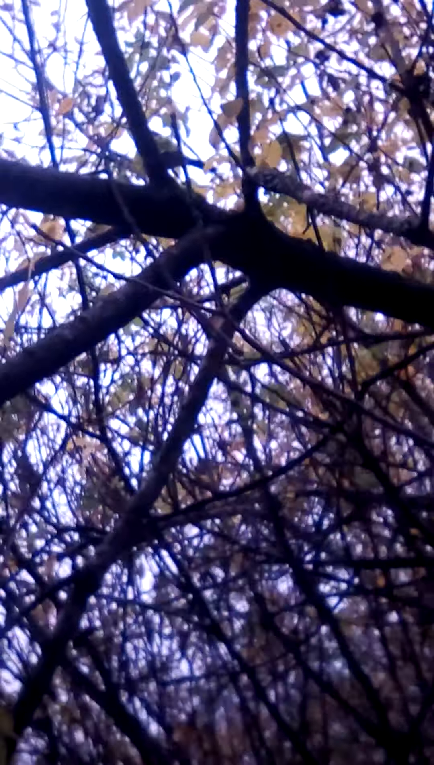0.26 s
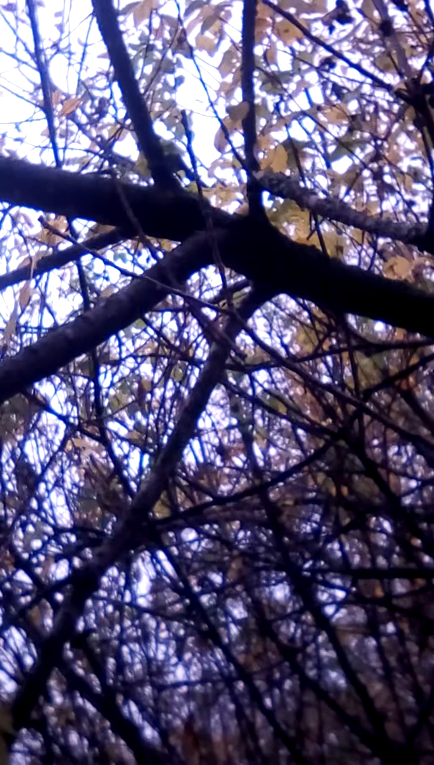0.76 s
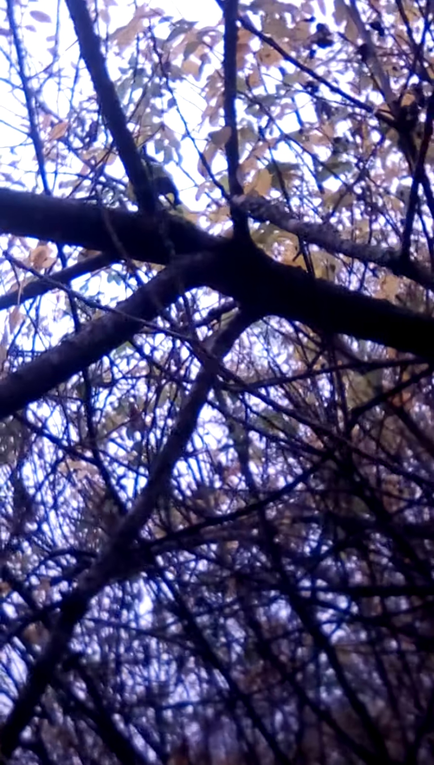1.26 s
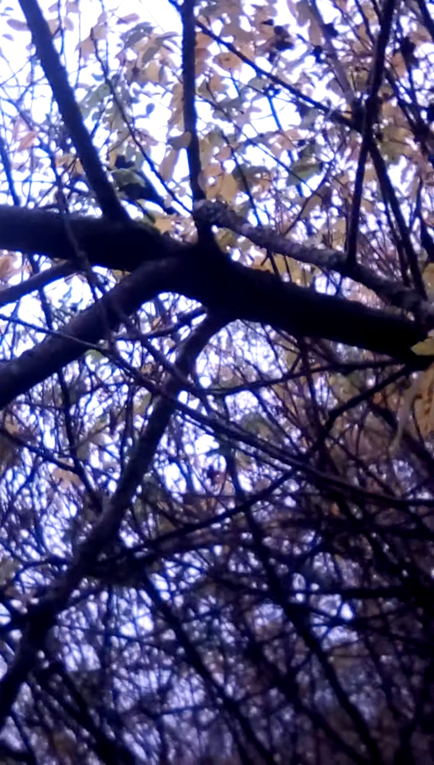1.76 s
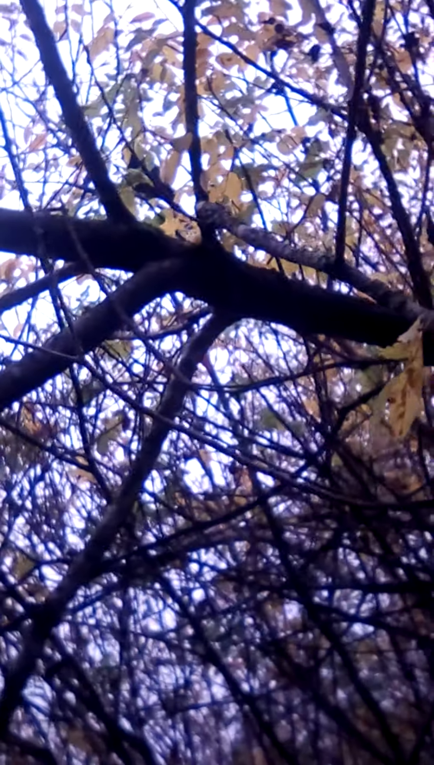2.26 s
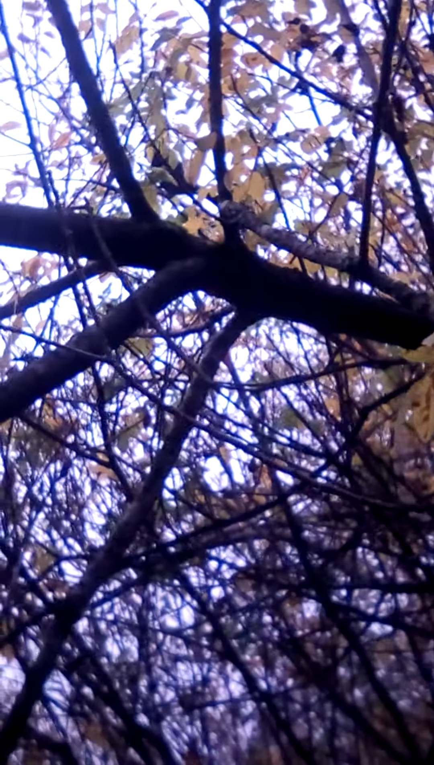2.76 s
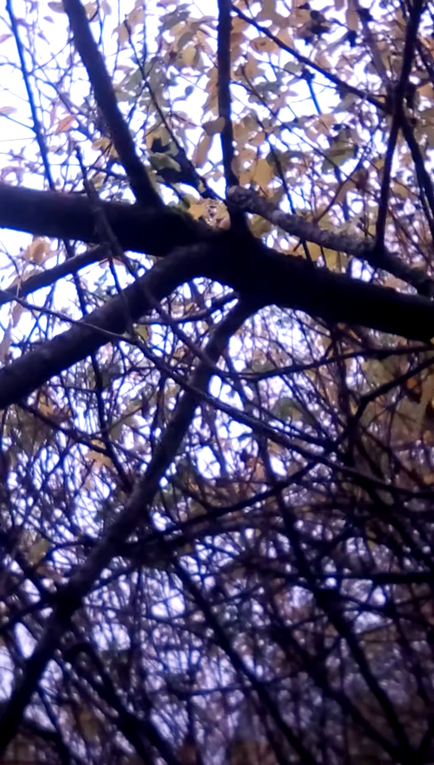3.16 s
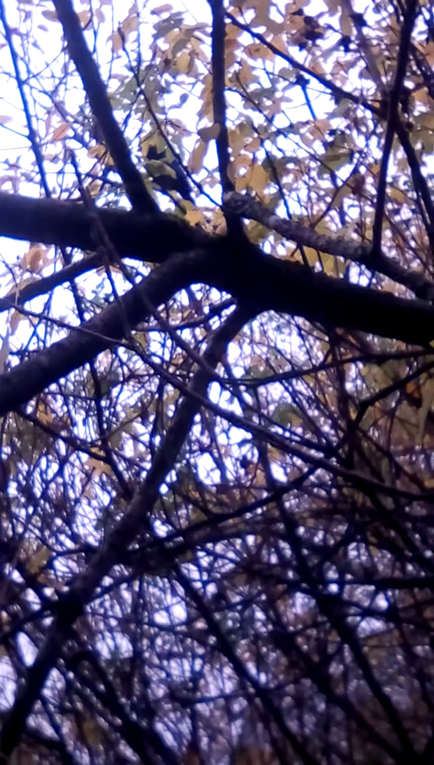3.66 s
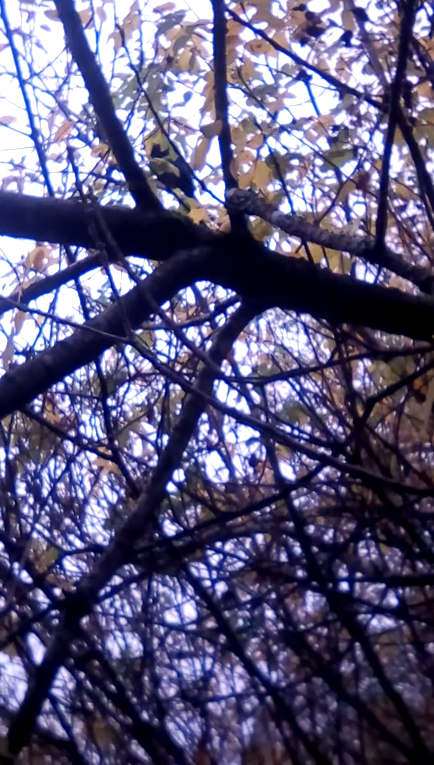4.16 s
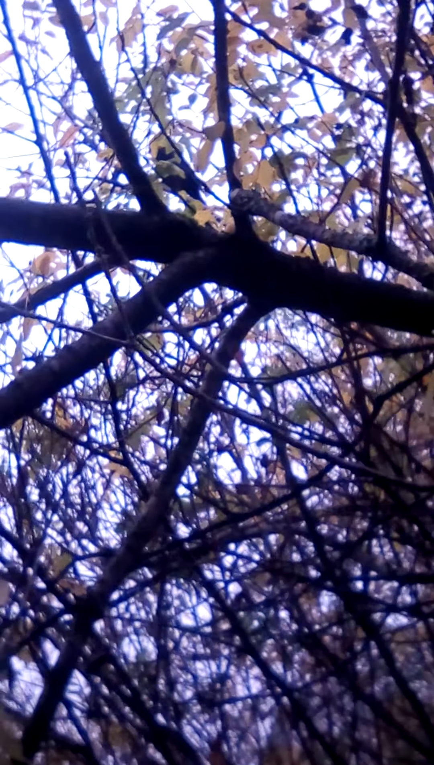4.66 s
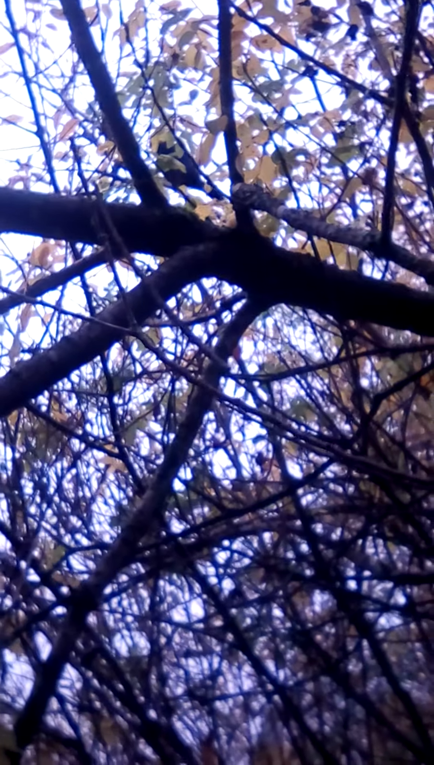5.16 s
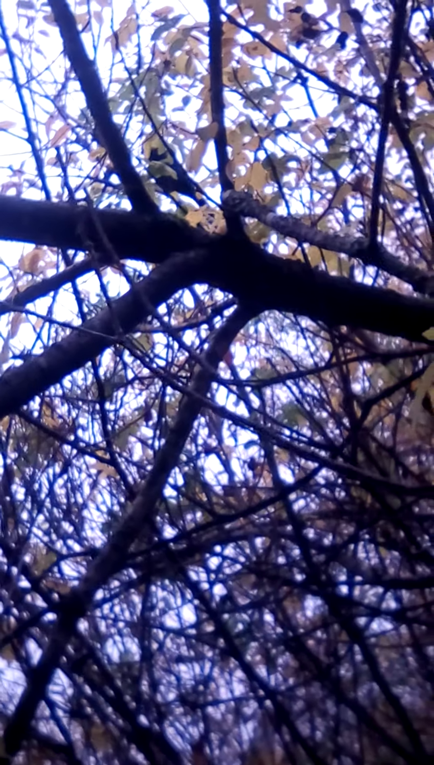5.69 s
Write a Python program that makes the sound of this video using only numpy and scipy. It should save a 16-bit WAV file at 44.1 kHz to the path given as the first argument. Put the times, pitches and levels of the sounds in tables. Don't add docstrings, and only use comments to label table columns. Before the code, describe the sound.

A bird in bare trees gives three quick runs of harsh, raspy chattering calls over a faint, steady distant road rumble.

```python
import sys
import numpy as np
from scipy import signal
from scipy.fft import rfft, irfft, next_fast_len
from scipy.io import wavfile
from scipy.ndimage import uniform_filter1d

SR = 44100
rng = np.random.default_rng(int(sys.argv[2]) if len(sys.argv) > 2 else 0)


def rack_gain(trim_db):
    fader = np.asarray(trim_db, float)
    return 10 ** (fader / 20)


def wrap_up_sound(samples):
    columns = np.atleast_2d(samples).T
    tamed = np.clip(columns, -1, 1)
    steps = np.round(tamed * 32767).astype(np.int16)
    wavfile.write(sys.argv[1], SR, steps)


N = 261513


def rms_one(x):
    return x / np.sqrt(np.mean(x ** 2) + 1e-20)


def along(rows, at):
    s, *columns = np.transpose(rows)
    return [np.interp(at, s, c) for c in columns]


def drift(rate_hz, size=N):
    settle = 9000
    r = np.exp(-2 * np.pi * rate_hz / SR)
    noise = rng.standard_normal(size + settle)
    return rms_one(signal.lfilter([1], [1, -2 * r, r * r], noise)[settle:])


def tone(hz):
    return np.sin(2 * np.pi * np.cumsum(hz) / SR)


def resonate(x, hz, width_hz):
    r = np.exp(-np.pi * width_hz / SR)
    poles = [1, -2 * r * np.cos(2 * np.pi * hz / SR), r * r]
    return signal.lfilter([(1 - r * r) / 2, 0, (r * r - 1) / 2], poles, x)


def coloured(spectrum, patchy_db):
    size = next_fast_len(N)
    hz = np.maximum(np.fft.rfftfreq(size, 1 / SR), 1)
    points_hz, points_db = np.transpose(spectrum)
    inside = (hz >= points_hz[0]) & (hz <= points_hz[-1])
    gain = rack_gain(np.interp(np.log(hz), np.log(points_hz), points_db))
    noise = rfft(rng.standard_normal(size)) * inside * gain
    octave = np.log2(hz)
    out = np.zeros(N)
    for k in range(int(octave[inside][0]), int(octave[inside][-1]) + 2):
        band = irfft(noise * np.clip(1 - abs(octave - k), 0, 1), size)[:N]
        out += band * rack_gain(patchy_db * drift(7.5))
    return rms_one(out)


# (frequency [Hz], density [dB per Hz])
RUMBLE_SPECTRUM = [(12, -39), (20, -20.5), (54, -2), (92, 0.5), (172, -5.5), (211, -10), (276, -11.5),
                   (347, -23.5), (420, -20.5), (550, -40), (920, -120)]
ROAR_SPECTRUM = [(180, -25), (300, -4), (386, -7.5), (605, -3), (887, -2.5), (983, -0.5), (1340, -3.5),
                 (1430, -4.5), (2180, -15.5), (2800, -23), (3640, -57.5), (6160, -120)]
HISS_SPECTRUM = [(1290, -20), (2200, -4), (2880, 0), (4570, -10), (5700, -11.5), (7280, -26.5),
                 (9460, -57.5), (16000, -120)]
# (time [s], tyre roar [dB])
CAR_ROAR = [
    (0.0, -55.5),
    (.81, -55),
    (1.34, -50),
    (2.21, -47),
    (2.89, -47),
    (3.3, -49),
    (4.0, -49),
    (4.66, -51.5),
    (5.2, -49),
    (5.93, -49.5),
]
# (time [s], hiss [dB])
BREEZE_HISS = [
    (0.0, -65.5),
    (.58, -62.5),
    (1.04, -70.5),
    (1.95, -63.5),
    (2.4, -64),
    (2.89, -59),
    (3.75, -59.5),
    (4.6, -67),
    (5.15, -58.5),
    (5.93, -59.5),
]
RUMBLE_DB = -44.5


def road():
    t_s = np.arange(N) / SR
    roar_db, = along(CAR_ROAR, t_s)
    hiss_db, = along(BREEZE_HISS, t_s)
    rumble = rack_gain(RUMBLE_DB) * coloured(RUMBLE_SPECTRUM, patchy_db=1.0)
    roar = rack_gain(roar_db) * coloured(ROAR_SPECTRUM, patchy_db=0.78)
    hiss = rack_gain(hiss_db) * coloured(HISS_SPECTRUM, patchy_db=2.0)
    return rumble + roar + hiss


# (time [s], peak [dB])
TING_CLICKS = [
    (4.997, -39),
    (.012, -50),
]
# (frequency [Hz], level [dB], T60 [s])
TING_MODES = [(4200, 0, .18), (4330, -5, .04), (6050, -24, .2), (8370, -22, .12), (9050, -19, .2),
              (9350, -14, .1)]


def tings():
    out = np.zeros(N)
    for hz, level_db, t60_s in TING_MODES:
        clicks = np.full(N, 1e-18)
        for s, db in TING_CLICKS:
            clicks[round(s * SR)] = rack_gain(db + level_db)
        r = rack_gain(-60 / (t60_s * SR))
        w = 2 * np.pi * hz / SR
        out += signal.lfilter([0, np.sin(w)], [1, -2 * r * np.cos(w), r * r], clicks)
    return out


# (time [s], length [s], pitch [Hz], glide [Hz], level [dB])
WHISTLES = [(.24, .06, 6600, -100, -55), (.378, .02, 6450, 350, -52), (.398, .02, 6800, 0, -58),
            (4.955, .03, 6750, 0, -59), (5.088, .02, 5250, 150, -60), (2.712, .025, 6850, 0, -64),
            (2.755, .025, 8900, 0, -58), (2.468, .028, 8900, 0, -59), (1.28, .05, 4200, 0, -74),
            (1.79, .1, 4000, 0, -71), (1.83, .06, 4500, 0, -72), (1.88, .19, 3950, -200, -68)]


def twitter():
    out = np.zeros(N)
    for s, length_s, hz, glide_hz, db in WHISTLES:
        at, size = round(s * SR), round(length_s * SR)
        share = np.arange(size) / size
        swell = np.sin(np.pi * share) * rack_gain(db + 4 * drift(50, size))
        pitch_hz = (hz + glide_hz * share) * (1 + .012 * drift(60, size))
        out[at:at + size] += swell * tone(pitch_hz)
    return out


def streaked(x):
    hz, _, z = signal.stft(x, SR, nperseg=768)
    chance = uniform_filter1d(rng.standard_normal(z.shape), size=7, axis=1)
    depth_db = 4.0 * np.clip((hz[:, None] - 2900) / 700, 0, 1)
    gain = rack_gain(depth_db * rms_one(chance) - depth_db ** 2 * np.log(10) / 20)
    return signal.istft(z * gain, SR, nperseg=768)[1][:N]


TREES_T60_S, TREES_DB = .2, -5


def trees(x):
    t_s = np.arange(SR // 2) / SR
    build_up = np.clip(t_s / .015, 0, 1)
    cloud = rng.standard_normal(len(t_s)) * rack_gain(-60 * t_s / TREES_T60_S) * build_up
    cloud = signal.lfilter([1, -.8], [1], cloud)
    echoes = signal.fftconvolve(x, cloud / np.sqrt(np.sum(cloud ** 2)))[:len(x)]
    return x + rack_gain(TREES_DB) * echoes


USUAL_TOP_HZ = 2606
REST_HZ, CLIMB_HZ_PER_MS, ROUND_MS, SAG_MS, SAG_TO_HZ = 1790, 130.2, 3.6, 10.5, 1647


def arch_pitch(top_hz, ms):
    away_ms = np.hypot(ms, ROUND_MS) - ROUND_MS
    rising_hz = np.maximum(top_hz - CLIMB_HZ_PER_MS * away_ms, REST_HZ)
    falling_hz = SAG_TO_HZ + (top_hz - SAG_TO_HZ) * np.exp(-away_ms / SAG_MS)
    return np.where(ms < 0, rising_hz, falling_hz)


MOUTH_HZ, MOUTH_WIDTH_HZ, OFF_MOUTH_DB = 2360, 230, -8
DIP_DB_PER_HZ, DIP_MS = -0.0655, 2.3


def mouth_db(arch_hz, over_hz, ms):
    off_db = OFF_MOUTH_DB * (1 - np.exp(-((arch_hz - MOUTH_HZ) / MOUTH_WIDTH_HZ) ** 2))
    return off_db + DIP_DB_PER_HZ * over_hz * np.exp(-(ms / DIP_MS) ** 2)


GRACE_MS, GRACE_MS_PER_HZ, GRACE_GLIDE_MS = -17, 0.017, 6.3
GRACE_HZ, GRACE_SWING_HZ = 2330, 610
GRACE_DB, GRACE_STRAIN_SHARE, GRACE_DB_PER_MS2 = -14.5, .3, .17


def grace_whistle(level_db, strain_db, over_hz, ms):
    from_centre_ms = ms - GRACE_MS - GRACE_MS_PER_HZ * over_hz
    hz = GRACE_HZ + GRACE_SWING_HZ * np.tanh(from_centre_ms / GRACE_GLIDE_MS)
    db = level_db + GRACE_DB + GRACE_STRAIN_SHARE * strain_db - GRACE_DB_PER_MS2 * from_centre_ms ** 2
    return rack_gain(db + 2.2 * drift(70, len(ms))) * tone(hz)


# (frequency [Hz], level [dB])
RASP_COLOUR = [(2300, -6), (2900, 2), (3300, -2.5), (3750, 4), (4300, 3.5), (4700, -11), (5200, -15),
               (6000, -20.5)]


def rasp(hz, phase):
    size = len(hz)
    out = np.zeros(size)
    for k in range(4, 10):
        wobble = drift(190, size) + 1j * drift(190, size) + .5
        partial = np.real(wobble * np.exp(1j * k * phase))
        out += rack_gain(along(RASP_COLOUR, k * hz)[0]) * partial * 0.49
    return out


# (frequency [Hz], width [Hz], level [dB])
BEAK_MODES = [(5100, 670, 11), (6100, 850, 8.5), (6580, 650, 9), (7085, 460, -0.5), (9180, 1800, -6.5)]


def breath(size):
    air = rng.standard_normal(size) * rack_gain(1.3 * drift(60, size))
    out = np.zeros(size)
    for k, (hz, width_hz, db) in enumerate(BEAK_MODES):
        out += rack_gain(db) * resonate(resonate(air, hz, width_hz), hz, width_hz) * (-1) ** k
    return rms_one(out)


def layer(shape, ms, level_db, strain_db):
    db, share, start_ms, end_ms, attack, release = shape
    fade_db = attack * np.maximum(start_ms - ms, 0) + release * np.maximum(ms - end_ms, 0)
    return uniform_filter1d(rack_gain(level_db + db + share * strain_db - fade_db), size=130)


# (level re note [dB], share of strain [1], full from [ms], full until [ms],
# attack [dB/ms], release [dB/ms])
ARCH_LAYER = (0.0, 0.0, -8, 28, 4.5, 3)
LEAD_IN_LAYER = (-22, 0.7, -23.5, -10, 4, 1)
SECOND_LAYER = (-11.5, 0.0, -3.5, 0.5, 3, 1.1)
FOURTH_LAYER = (-13.5, 0.5, 10, 36, 3, 2.5)
RASP_LAYER = (-16.5, 0.13, 15.5, 32.5, 0.8, .65)
BREATH_LAYER = (-25.5, 0.19, 0, 35, 0.8, .5)
THROAT_HZ = 2498


def note(top_hz, level_db, stretch, strain_db, hook_db, ms):
    def gain(shape):
        return layer(shape, ms, level_db, strain_db)

    size, over_hz = len(ms), top_hz - USUAL_TOP_HZ
    grace = grace_whistle(level_db, strain_db, over_hz, ms)
    ms = ms / np.where(ms > 0, np.clip(stretch, .6, 1.6), 1)
    arch_hz = arch_pitch(top_hz, ms)
    pulse_hz = uniform_filter1d(arch_hz / 3, size=70) * (1 + 0.0051 * drift(120, size))
    phase = 2 * np.pi * np.cumsum(pulse_hz) / SR

    body = gain(ARCH_LAYER) * rack_gain(mouth_db(arch_hz, over_hz, ms)) + gain(LEAD_IN_LAYER) * rack_gain(hook_db)
    third = np.sin(3 * phase) + .2 * drift(250, size) * np.cos(3 * phase)
    out = body * rack_gain(1.2 * drift(70, size)) * third

    unsteady_phase = phase + 0.56 * drift(180, size)
    out += gain(SECOND_LAYER) * rack_gain(1.5 * drift(80, size)) * np.sin(2 * unsteady_phase)

    locked_hz = np.maximum(4 * pulse_hz, THROAT_HZ - 40 * np.maximum(ms - 32, 0))
    locked = 2 * np.pi * np.cumsum(locked_hz) / SR
    out += gain(FOURTH_LAYER) * rack_gain(2.0 * drift(80, size)) * np.sin(locked + 1.3 * drift(150, size))

    out += grace + gain(RASP_LAYER) * rasp(pulse_hz, phase) + gain(BREATH_LAYER) * breath(size)
    return out * np.clip((ms + 32) / 4, 0, 1) * np.clip((80 - ms) / 10, 0, 1)


# (time at top of arch [s], top [Hz], level [dB], stretch of fall [1], strain [dB])
JAY_NOTES = [(-.014, 2594, -30, 0.87, -3), (.118, 2723, -30.5, 0.97, -3), (.267, 2570, -30, 1.02, 0.5),
             (0.403, 2587, -29.5, 0.93, -3.5), (0.555, 2690, -31, 1.09, -7), (.701, 2716, -34.5, 1.14, -19),
             (2.449, 2746, -29.5, 0.93, 5.5), (2.582, 2573, -30, 0.96, 4), (2.729, 2750, -29.5, .98, 0.0),
             (2.869, 2543, -32, 1.12, 5.5), (3.022, 2665, -33, 1.0, 0), (3.181, 2667, -31.5, 1.01, 1),
             (4.976, 2786, -30, 1.16, 1), (5.113, 2773, -31, 0.87, 1.5), (5.251, 2644, -27.5, 0.94, -1),
             (5.4, 2740, -30, 1.1, 6.5), (5.544, 2674, -29.5, 1.07, 1), (5.688, 2595, -32, 0.94, 6.5),
             (5.844, 2618, -30, 0.98, 4.5)]
# (time at top of arch [s], level [dB])
LEAD_IN_HOOKS = [
    (.267, 4),
    (2.45, 5),
    (2.729, -3),
    (3.022, 6),
    (3.182, 7),
    (4.977, -8),
    (5.113, 12.5),
    (5.4, 3),
    (5.544, -4),
]
RUN_IN = 4000


def jay():
    lead, size = 2000, 6500
    ms = (np.arange(size) - lead) * 1000 / SR
    out = np.zeros(N + 2 * size)
    for s, *shape in JAY_NOTES:
        at = round(s * SR) + size - lead
        hook_db = sum(db for when, db in LEAD_IN_HOOKS if abs(when - s) < .05)
        out[at:at + size] += note(*shape, hook_db, ms)
    return out[size - RUN_IN:]


def scene():
    bird = trees(jay())[RUN_IN:RUN_IN + N]
    return (streaked(bird + road()) + tings() + twitter())[None]


def roll_off(x):
    return signal.sosfilt(signal.butter(12, 15760, fs=SR, output="sos"), x)


# (frequency [Hz], density [dB per Hz])
CIRCUIT_NOISE = [(7000, -1), (7800, -8.5), (10000, -9), (13900, -10.5), (14800, 1), (15700, 1)]
# (frequency [Hz], level [dB])
CIRCUIT_WHINE = [(6448, -103), (12897, -108)]
CUTOFF_HZ, SHELF_DB, CIRCUIT_DB = 7600, -31, -85.5


def record(dry):
    low_pass = signal.butter(12, CUTOFF_HZ, fs=SR, output="sos")
    cut = signal.sosfilt(low_pass, dry) + rack_gain(SHELF_DB) * dry
    t_s = np.arange(N) / SR
    whine = sum(rack_gain(db) * np.sqrt(2) * np.sin(2 * np.pi * hz * t_s) for hz, db in CIRCUIT_WHINE)
    wet = cut + whine + rack_gain(CIRCUIT_DB) * coloured(CIRCUIT_NOISE, patchy_db=0)
    return roll_off(wet)


dry = scene()
out = record(dry)
wrap_up_sound(out)
```